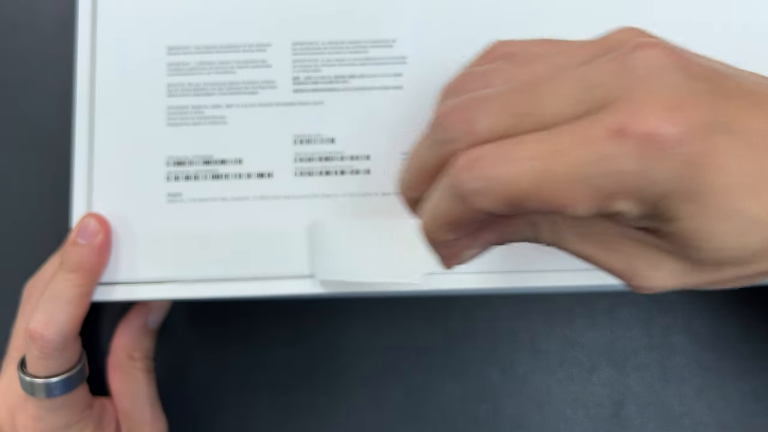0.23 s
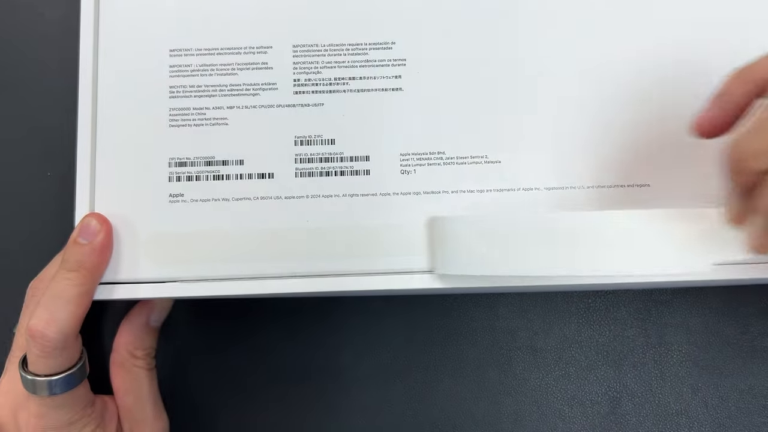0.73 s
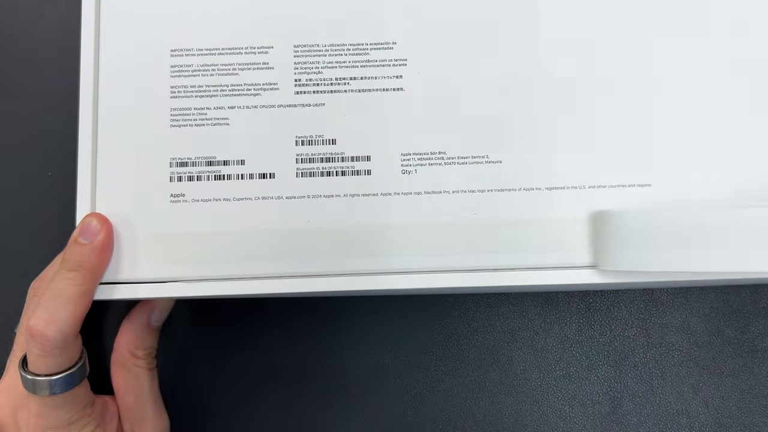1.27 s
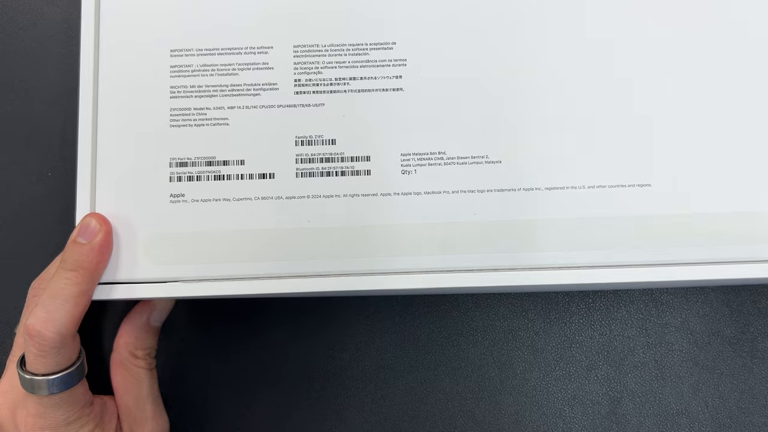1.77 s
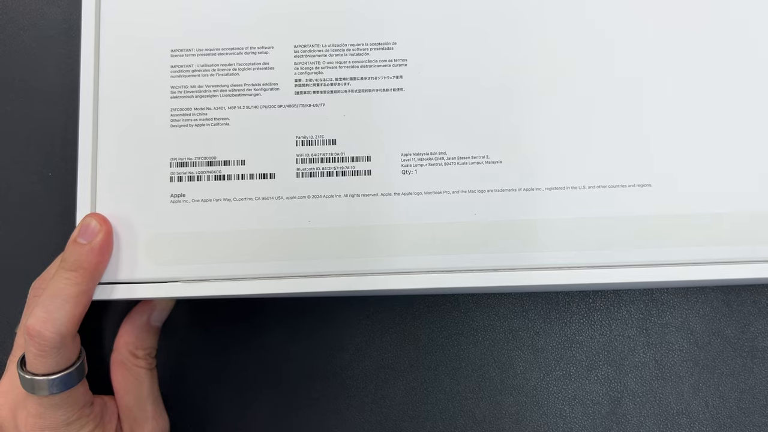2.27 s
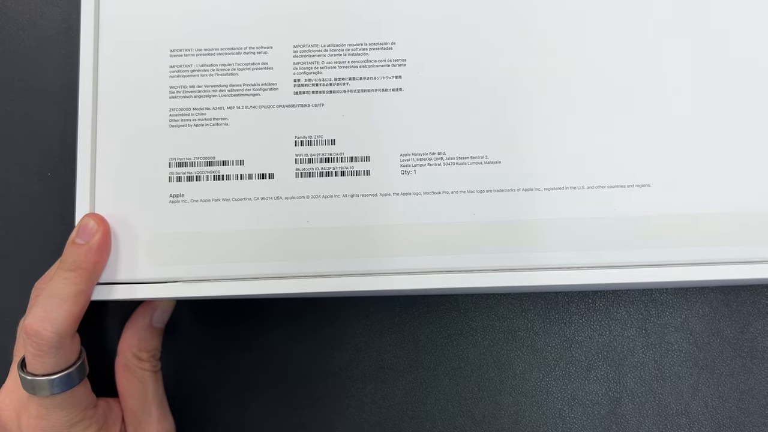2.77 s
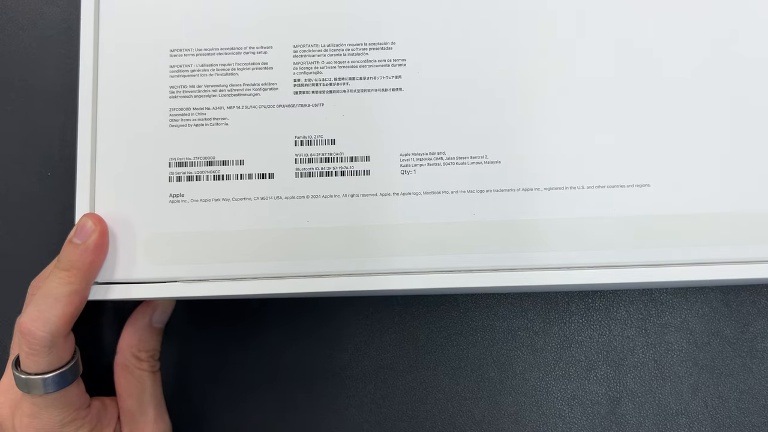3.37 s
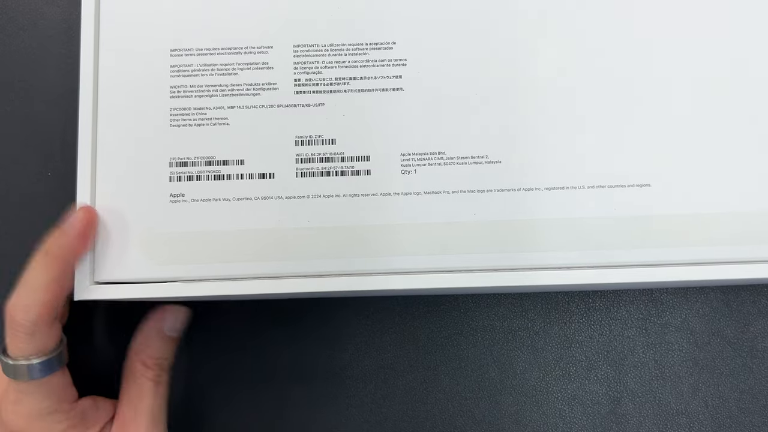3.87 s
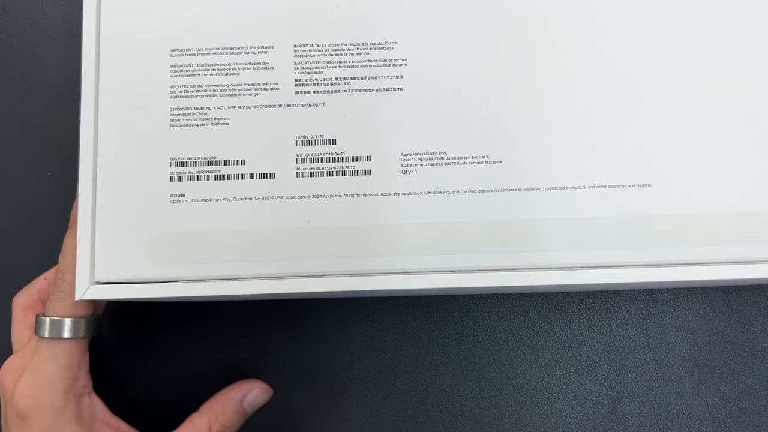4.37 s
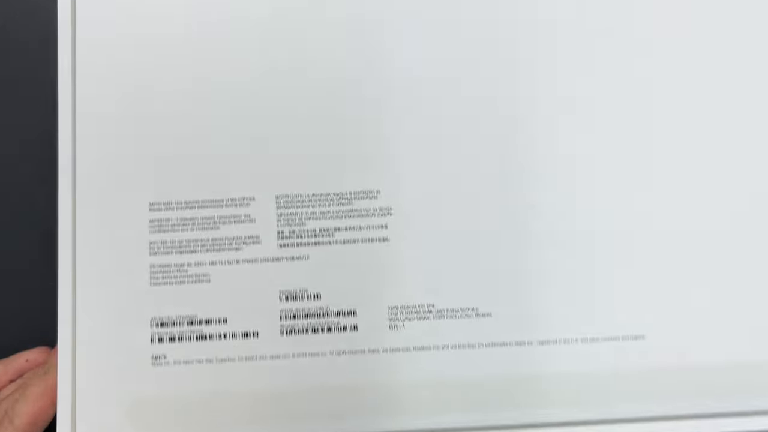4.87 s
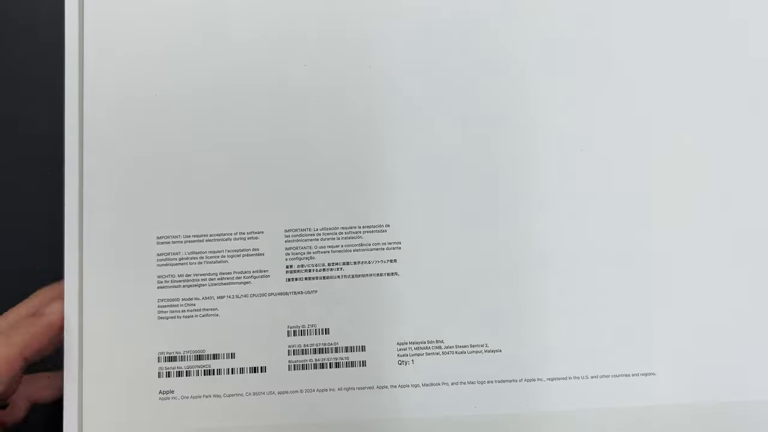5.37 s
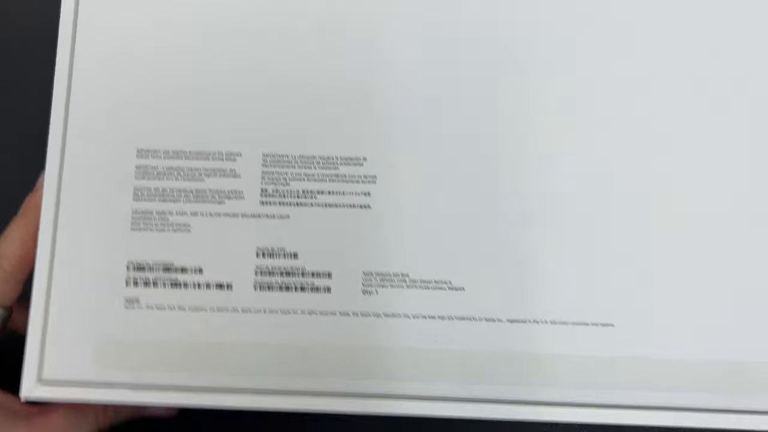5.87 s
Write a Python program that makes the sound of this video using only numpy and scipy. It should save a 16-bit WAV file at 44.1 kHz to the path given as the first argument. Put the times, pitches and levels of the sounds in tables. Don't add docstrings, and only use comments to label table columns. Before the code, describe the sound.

Crackling peel of a glued cardboard strip ends in a sharp snap; after a quiet gap, hard little taps and faint box rubbing over ventilation rumble.

```python
import sys
import numpy as np
from scipy import signal
from scipy.fft import rfft, irfft
from scipy.io import wavfile
from scipy.ndimage import uniform_filter1d

SR = 44100
rng = np.random.default_rng(int(sys.argv[2]) if len(sys.argv) > 2 else 0)


def attenuation_scalar(level_db):
    decades = np.asarray(level_db, float) / 20
    return 10 ** decades


def wrap_up_sound(samples):
    columns = np.atleast_2d(samples).T
    tamed = np.clip(columns, -1, 1)
    steps = np.round(tamed * 32767).astype(np.int16)
    wavfile.write(sys.argv[1], SR, steps)


N = 269495
TIME = np.arange(N) / SR
BINS = np.fft.rfftfreq(N, 1 / SR) + 1e-3
SHORT = 2048
SHORT_BINS = np.fft.rfftfreq(SHORT, 1 / SR) + 1
AGE = (np.arange(SHORT) - SHORT // 8) / SR

# time_s, rasp_level_db, lid_load_db
PULL = [(0.0, -52, -4), (0.3, -51, -2), (0.55, -48, 1), (0.8, -48.5, -3.5), (0.95, -49.5, -3.5),
        (1.12, -46, 1), (1.41, -44.5, 2.5), (1.68, -46.5, 0), (1.87, -50.5, 1), (2.04, -45.5, -0.5),
        (2.15, -50.5, -2.5), (2.3, -45.5, 4)]
# time_s, lid_pitch_hz, strip_tension_db_per_octave
TRAVEL = [(0, 1300, 6), (.85, 1460, 6), (1.1, 1050, 1), (1.32, 1020, 2), (1.45, 730, 2), (1.6, 560, 15),
          (1.75, 480, -1), (1.95, 523, 3), (2.05, 523, 2), (2.3, 980, 11)]
# time_s, level_db
BOOM = [(0, 10), (.3, 1), (.7, -0.5), (1.1, 0.5), (1.3, -2.5), (1.5, 1), (1.75, -2.5), (2.05, 3.5),
        (2.3, 0)]
# start_s, level_db, tick_db (re level), ring_hz
DEEP_CRACKS = [(0.3332, -43.5, 13, 3320), (0.6038, -37.5, 5, 3100), (0.6757, -46, -5, 5630),
               (0.7275, -33, -1, 3300), (0.9852, -36.5, -3, 3050), (1.0867, -40, 11, 2260),
               (1.102, -39, 5, 3400), (1.1123, -32, 3, 3140), (1.159, -37, 3, 2780),
               (1.1929, -34.5, 5, 2200), (1.2325, -35.5, -2, 3330), (1.2618, -36, 6, 3070),
               (1.2864, -33.5, 7, 3270), (1.3265, -34, 13.5, 2200), (1.388, -41, -9, 3200),
               (1.412, -35, 1, 5500), (1.421, -28.5, 10, 3180), (1.4547, -31.5, 3, 2000),
               (1.5018, -32, -8, 3700), (1.5084, -35.5, 10, 3170), (1.5385, -36.5, 13, 3060),
               (1.6134, -34, 11, 5370), (1.6984, -38, 13, 3550), (1.745, -32.5, -8.5, 3460),
               (1.7834, -38, 10, 4700), (1.839, -33, 4, 5960), (1.9864, -28.5, 8.5, 5500),
               (2.0443, -32, 0, 5830), (2.0821, -36, 10, 4040), (2.109, -38.5, 1, 4080)]
# start_s, level_db, tick_db (re level), ring_hz
DRY_CRACKS = [(0.099, -35.5, 7, 3370), (0.135, -37, 1, 6230), (0.186, -36, 3, 6240),
              (0.2222, -38, -1, 3280), (0.2683, -41, 13, 2230), (0.4515, -37, -12, 3400),
              (0.491, -29.5, -18, 3260), (0.5255, -30, 6, 3660), (0.5539, -28, 4, 3400),
              (0.5646, -32, 10, 3430), (0.597, -30, 11, 4500), (0.7557, -33, 14, 3470),
              (0.7856, -32, 3, 3170), (0.8365, -30.5, 2, 3180), (0.9254, -31, -5, 3200),
              (1.0461, -30, 4, 3120), (1.0773, -34, -1, 3500), (1.1393, -28, 3, 3240),
              (1.1705, -33, 2, 3250), (1.2533, -33, 5, 3400), (1.311, -37, 2, 2200), (1.4604, -39, 6, 3080),
              (1.7182, -32, 3, 4570), (1.7596, -31.5, 9.5, 4700), (1.9185, -33, -4, 6000),
              (2.0117, -36, -3, 5760), (2.0305, -31, -7, 5800), (2.074, -32.5, -6, 5330),
              (2.1819, -33.5, 6, 3400), (2.2405, -28.5, -12, 4840)]
# start_s, level_db, thump_db (re level), tick_db (re level), ring_hz
LAST_CRACKS = [
    (2.2722, -36, -17, 2, 4890),
    (2.278, -32.5, -11, 9, 4700),
    (2.2833, -33, -8, 4, 4770),
    (2.288, -25, -8.5, -2, 4300),
    (2.2905, -37, 5, -6, 4000),
    (2.295, -30, -12, -8, 4140),
    (2.298, -35, -14, -8, 3880),
    (2.302, -21, -9, -22, 4500),
]
# start_s, level_db, thump_db (re level), tick_db (re level), ring_hz
SNAP = [
    (2.303, -21, -13, 11.5, 4400),
]
# level_db, thump_db, tick_db
SMALL_SPREAD_DB = [5, 5, 5]
# time_s, ring_hz
STRIP_PITCH = [(0, 3300), (1.55, 3300), (1.75, 4800), (2.3, 4800)]
# start_s, peak_db, body_db (re peak)
EARLY_TICKS = [(0.0122, -37, 1), (0.0325, -42, -9), (0.04, -37.5, -13), (0.05, -29.5, -6),
               (0.0612, -47, -7), (0.0758, -37, 5), (0.0846, -36, -5), (0.0977, -39, -5),
               (0.1237, -37, -13), (0.1352, -30, 0), (0.1439, -43, -8), (0.1656, -41, -5),
               (0.1866, -34, -10), (0.1946, -38, -11), (0.2018, -44, -13), (0.2217, -31.5, 0),
               (0.2314, -29, 0), (0.242, -41, -4), (0.2463, -42, -5), (0.2516, -40, 0), (0.2697, -29, -11),
               (0.2754, -43, -6), (0.2811, -36, -9), (0.2902, -41, -4), (0.2996, -44, -10),
               (0.3277, -35.5, -9), (0.3336, -38, -6), (0.3436, -33, 6), (0.3777, -34, 0),
               (0.3992, -39, -7), (0.4073, -43, -7), (0.4529, -40, 7), (0.4628, -37, 4), (0.4912, -41, 7),
               (0.515, -36, -4), (0.525, -36, -1), (0.535, -37, 5), (0.5553, -33, 2), (0.5649, -36, 0),
               (0.5793, -45, -4), (0.5974, -31, -1), (0.6041, -31, 9), (0.6228, -41, -3), (0.6571, -48, -1),
               (0.6772, -33.5, 5), (0.7275, -33.5, 0), (0.7546, -33, -8), (0.7594, -37, 6),
               (0.7759, -36, 0), (0.7975, -33, 0), (0.8258, -38, -4), (0.8786, -41, -1), (0.8875, -42, -3),
               (0.9077, -42, -2), (0.9283, -36, -6), (0.9771, -39, -3), (1.0034, -35, -2),
               (1.0466, -38, -2), (1.0771, -35, -3), (1.0869, -31, 5)]
LATE_TICKS = [(1.1026, -35, -6), (1.1132, -31, -2), (1.1204, -43, -5), (1.128, -42, -7), (1.1354, -38, 2),
              (1.1402, -32, -4), (1.155, -35, -1), (1.1587, -39, -5), (1.166, -41, -5), (1.1932, -35, 1),
              (1.233, -34.5, -8), (1.246, -36, -5), (1.2539, -31, 1), (1.261, -33, 1), (1.288, -31.5, -4),
              (1.3133, -33, -4), (1.327, -31, -5), (1.3485, -40, -4), (1.3651, -40, -1), (1.38, -33, -3),
              (1.4021, -41, -4), (1.4144, -30, -3), (1.4213, -35.5, -1), (1.4528, -37, 0),
              (1.461, -30.5, -6), (1.509, -37, -8), (1.515, -44, -5), (1.5385, -35, -7), (1.5756, -33, -4),
              (1.5885, -33, -2), (1.596, -40, -1), (1.607, -39, -5), (1.614, -36, -3), (1.6922, -43, 5),
              (1.6987, -33, 4), (1.7142, -38, -1), (1.739, -40, 5), (1.745, -42, 2), (1.7827, -32, -6),
              (1.789, -34, -8), (1.8245, -40, -4), (1.8313, -40, -3), (1.838, -37, -9), (1.8453, -37, -2),
              (1.8597, -32, 5), (1.9108, -42, -3), (1.968, -41, 9), (1.9861, -44, -5), (2.0124, -36, -7),
              (2.0194, -37, -7), (2.0314, -35, -6), (2.045, -33, -3), (2.0739, -37, 4), (2.083, -41.5, -4),
              (2.1096, -36, -3), (2.1282, -40, 2), (2.172, -37, -2), (2.211, -39, -3), (2.2305, -41, -6),
              (2.243, -38, 0)]
TICKS = np.vstack([EARLY_TICKS, LATE_TICKS])
# start_s, level_db, thump_db (re level), tick_db (re level), ring_hz
CLICKS = [(2.887, -56, -10, 5, 5000), (3.45, -62, 6, 5, 5000), (3.6068, -29, -6.5, 7.5, 4150),
          (3.613, -41, 2, 12, 6400), (3.6212, -42, -11, 6, 4400), (3.6564, -53, -13, 19, 5300),
          (3.7546, -41.5, -43, 10, 5300), (3.7565, -43, -40, 3, 5230), (3.7605, -47, -34, 9, 5200),
          (3.7635, -44, -34, -6, 5200), (3.779, -52, -34, -6, 5200), (3.8755, -52, -2, 9, 4500),
          (4.0664, -46, -3, -4, 2630), (4.2075, -54, -4, -9, 2020), (4.2205, -36, -9, -10, 2300),
          (4.2217, -50, -20, -10, 4470), (4.2335, -44, -15, -3, 4400), (4.244, -58, 13, -26, 1960),
          (4.2602, -23, -9, 7.5, 5000), (4.268, -34.5, 1, 4, 4700), (4.3325, -35.5, -9, 1, 3380),
          (4.405, -54, 10, -3, 4000), (4.4105, -46, 5, 8, 5080), (4.414, -50.5, 8, -5, 2730),
          (5.239, -53, 0, -1, 5760), (5.54, -54, -7, 5, 5000), (5.662, -54.5, 10, -10, 2500)]
# start_s, level_db, pitch_hz, t60_s
KNOCKS = [
    (4.2625, -39.5, 760, 0.14),
    (3.608, -44, 790, 0.16),
]
# peak_s, level_db, rise_db_per_s, fall_db_per_s, brightness_db
STROKES = [
    (3.458, -66, 120, 400, -2),
    (4.45, -70, 600, 10, -6),
    (4.662, -52, 44, 65, -12),
    (5.232, -63, 800, 450, 3),
    (5.322, -64, 342, 210, 2),
    (5.568, -62.5, 159, 300, -0.5),
    (5.702, -69, 60, 18, -7),
    (6.068, -52, 30, 12, -9),
]
# pitch_hz, width_hz, level_db
LID = [(480, 39, 11), (616, 105, 13), (763, 48, 8), (1050, 270, 8), (1300, 46, 6.5), (1576, 125, 13)]
STRIP = [(2200, 610, 10), (3430, 610, 14), (4590, 510, 4.5), (5800, 2000, 2.5)]
DRUM = [(260, 203, -3), (368, 153, 0)]
SCRAPE = [(1000, 1300, 4), (1540, 2600, 2.5)]
# pitch_hz, level_db_per_hz
TICK = [(5000, -5), (6500, 4), (9000, -0.5), (11500, 0), (14500, 0), (15700, 5)]
# pitch_hz, t60_s, level_db
ROOM = [(300, 0.36, -21), (667, 0.28, 14.5), (1610, 0.38, 6.5), (3280, 0.33, 8), (5000, 0.34, 4.5),
        (7760, 0.31, -16), (12600, 0.31, 3.5)]
# pitch_hz, level_db_per_hz
RUMBLE = [(20, -96), (40, -76), (80, -71.5), (130, -70), (180, -75.5), (300, -75.5), (500, -84),
          (1000, -90), (2000, -101), (3600, -109), (6000, -120)]
HISS = [(2500, -120), (4800, -108), (6500, -105), (7700, -102), (8500, -106), (9100, -114), (12000, -116),
        (15500, -119)]
# pitch_hz, width_hz, level_db
WHINE = [(4230, 210, -71.5)]
HUM_HZ = [65, 100, 200, 700]
HUM_DB = [-52, -47.5, -52, -69]
# share, from_hz
ECHO_SHARE = (.985, 5000)
AIR_SHARE = (.88, 5800)
# pitch_hz, lead_rad
PORT_LEAD = [(0, 0), (700, -.6), (1700, 0), (2800, 2.2), (3800, 1.5), (5100, 1.2), (5900, np.pi),
             (14800, 5 * np.pi), (19250, 7 * np.pi)]
# pitch_hz, level_db
PORT_BALANCE = [(400, 0), (1200, -1), (2500, -2.5), (4500, -2.5), (5600, 0)]


def peel():
    s, *columns = np.transpose(PULL)
    pull_db, load_db = (np.interp(TIME, s, c) for c in columns)
    travel_s, *columns = np.transpose(TRAVEL)
    lid_hz, tension_db = (np.interp(TIME, travel_s, c) for c in columns)
    thickness = fray()

    boom_db = np.interp(TIME, *np.transpose(BOOM))
    thumps = attenuation_scalar(load_db - 7.5 + boom_db) / thickness * bursts(150, 4.7, 0.0043)
    fibres = attenuation_scalar(-0.61 * load_db - 5) * bursts(900, 4.6, 0.0019)
    rasp = cardboard(thumps, fibres, DRUM)

    strip_hz = np.interp(TIME, *np.transpose(STRIP_PITCH))
    strip_db = [tension_db * np.log2(hz / strip_hz) - 22.5 for hz, _, _ in STRIP]
    rasp += rain(STRIP, strip_db, 220, 0.005)
    lid_db = [load_db - 27 - np.minimum(76 * np.log2(hz / lid_hz) ** 2, 12) for hz, _, _ in LID]
    rasp += rain(LID, lid_db, 300, 0.0022) / np.sqrt(thickness)

    jerk_db = 1.5 * wander(700)
    rasp *= (TIME < s[-1]) * attenuation_scalar(pull_db + jerk_db + 2) * thickness
    strong = cracks(*all_cracks(), decay_s=.0015, width_hz=500, strip_db=1, dull_hz=30000, tail_db=-17)
    return rasp + ticks() + strong


def all_cracks():
    deep = np.insert(np.array(DEEP_CRACKS), [2], -3.5, axis=1)
    dry = np.insert(np.array(DRY_CRACKS), [2], -18, axis=1)
    tick_trim_db = [0, 0, 0, -1.5, 0]
    return np.vstack([deep + tick_trim_db, dry + tick_trim_db, LAST_CRACKS, np.transpose(small_cracks())]).T


def small_cracks():
    per_s = 40
    s, pull_db, load_db = np.transpose(PULL)
    count = int(per_s * s[-1])
    times = (np.arange(count) + rng.random(count)) / per_s
    *colour, pitch = rng.standard_normal((count, 4)).T
    level_db, thump_db, tick_db = np.c_[SMALL_SPREAD_DB] * colour
    level_db = np.interp(times, s, pull_db) + 12 - abs(level_db)
    thump_db = np.interp(times, s, load_db) - 28 + thump_db
    ring_hz = np.interp(times, *np.transpose(STRIP_PITCH)) * 2 ** (.14 * pitch)
    return times, level_db, thump_db, tick_db - 4, ring_hz


def cracks(times, db, thump_db, tick_db, ring_hz, decay_s, width_hz, strip_db, dull_hz, tail_db):
    bins = SHORT_BINS
    envelope = np.exp(-abs(AGE) / decay_s) + attenuation_scalar(tail_db) * np.exp(-abs(AGE) / .006)
    puff = rfft(rng.standard_normal((len(times), SHORT)) * (AGE >= 0) * envelope)

    own_hz = ring_hz[:, None]
    own = resonate([(own_hz, width_hz, 0)], bins) / (1 + (0.35 * own_hz / bins) ** 4)
    ring = attenuation_scalar(strip_db + thump_db[:, None] / 2) * resonate(STRIP, bins) + own
    lid_hz = np.interp(times, *np.transpose(TRAVEL)[:2])[:, None]
    lid = resonate(LID, bins) + attenuation_scalar(6) * resonate([(lid_hz, 300, 0)], bins)
    tick = curve_gain(TICK, bins) / (1 + (bins / dull_hz) ** 3)
    parts = ((resonate(DRUM, bins), thump_db - 0.5), (lid, thump_db + 1), (ring, 0), (tick, tick_db - 7.5))

    total = sum(5.05 * attenuation_scalar(db + part_db)[:, None] * unit(puff * gain) for gain, part_db in parts)
    return impulses(times, irfft(total))


def ticks():
    s, peak_db, body_db = np.transpose(TICKS)
    puff = rfft(rng.standard_normal((len(s), SHORT)) * (AGE >= 0) * np.exp(-abs(AGE) / .0004))
    own_hz = np.interp(s, *np.transpose(STRIP_PITCH))[:, None]
    bright = irfft(puff * curve_gain(TICK, SHORT_BINS))
    body = irfft(puff * (resonate(STRIP, SHORT_BINS) + resonate([(own_hz, 600, 0)], SHORT_BINS)))

    def peak(x, db):
        return x * (attenuation_scalar(db) / abs(x).max(axis=1))[:, None]

    return impulses(s - .0003, peak(bright, peak_db + 4) + peak(body, peak_db + body_db - 6.5))


def fray():
    s, peak_db, _ = np.transpose(TICKS)
    swell = np.exp(-np.maximum(AGE / 0.0057, -AGE / 0.0029))
    return np.sqrt(.5 + impulses(s, attenuation_scalar(2 * (peak_db + 35.5))[:, None] * swell))


def rain(modes, weights_db, rate, decay_s):
    out = np.zeros(N)
    for (hz, width, db), weight_db in zip(modes, weights_db):
        clumps_db = 3.34 * wander(1500)
        fibres = attenuation_scalar(db + weight_db + clumps_db) * bursts(rate, 0.7, decay_s)
        out += shaped(fibres, resonate([(hz, width, 0)]))
    return out


def cardboard(low, high, body):
    return shaped(low, resonate(body)) + shaped(high, unit(curve_gain(TICK)))


def clicks():
    s, db, *colour = np.transpose(CLICKS)
    snap = cracks(*np.transpose(SNAP), decay_s=.00001, width_hz=1500, strip_db=0.91, dull_hz=30000, tail_db=-59)
    near = cracks(s, db, *colour, decay_s=0.0003, width_hz=1570, strip_db=0.5, dull_hz=8000, tail_db=-20)
    far = cracks(s, db - 8.5, *colour, decay_s=.00001, width_hz=3500, strip_db=3, dull_hz=4200, tail_db=-50)
    side = np.array([[.5], [-.5]])
    ports = attenuation_scalar(-3.5 * side) * snap + attenuation_scalar(-2 * side) * (near + knock())
    return ports, attenuation_scalar(-4) * snap + far


def knock():
    out = np.zeros(N)
    for s, db, hz, t60 in KNOCKS:
        since = TIME - s
        decay = np.exp(-np.log(1000) * abs(since) / t60)
        out += attenuation_scalar(db) * (since > 0) * decay * np.sin(2 * np.pi * hz * since)
    return out


def slide():
    round_db = 3
    push = np.zeros((3, N))
    for s, peak_db, rise_db, fall_db, bright_db in STROKES:
        drop_db = np.maximum(rise_db * (s - TIME), fall_db * (TIME - s))
        db = peak_db + round_db - np.hypot(drop_db, round_db)
        push = np.maximum(push, attenuation_scalar([db - 7.5 - 0.17 * bright_db, db - 5.5, db + bright_db]))
    grain = attenuation_scalar(0.74 * wander(400))
    low, middle, high = push * grain * rng.standard_normal((3, N))
    squeaks = rain([(1140, 260, -9), (1510, 280, -3), (1950, 220, -13)], [-13, -13, -13], 330, 0.0054)
    low = low + push[0] * squeaks
    return cardboard(low, high, SCRAPE) + shaped(middle, resonate([(2660, 500, -9.5), (4570, 3900, -15)]))


def room(x):
    t = TIME[:SR // 2]
    onset = np.clip((t - .007) / 0.0083, 0, 1)
    echo = np.zeros((2, N))
    for hz, t60, db in ROOM:
        band_pass = signal.butter(2, [hz / 1.48, hz * 1.69], "band", fs=SR, output="sos")
        band = signal.sosfilt(band_pass, rng.standard_normal((2, len(t))))
        echo[:, :len(t)] += attenuation_scalar(db) * band * np.exp(-np.log(1000) * t / t60) * onset
    return shaped(x, rfft(echo / np.sqrt(np.mean(np.sum(echo ** 2, axis=1)))))


def ventilation():
    mid, side = rfft(rng.standard_normal((2, N))) * np.sqrt(SR / 2)
    apart = .7 / (1 + (380 / BINS) ** 4)
    ports = (mid + apart * side * np.array([[1], [-1]])) / np.sqrt(1 + apart ** 2)
    air = irfft(np.hypot(curve_gain(RUMBLE), curve_gain(HISS)) * ports, N)
    whine = np.zeros(len(BINS))
    for hz, width, db in WHINE:
        whine += attenuation_scalar(db) * np.sqrt(2 / (np.pi * width) / (1 + (2 * (BINS - hz) / width) ** 4))
    shade = attenuation_scalar(np.interp(TIME, [4.3, 4.6], [0, -6]))
    air += shade * irfft(whine * ports[::-1] * 1j, N)
    for hz, db in zip(HUM_HZ, HUM_DB):
        air += np.sqrt(2) * attenuation_scalar(db) * np.sin(2 * np.pi * (hz * TIME + rng.random()))
    return air


def shared_treble(ports, share, from_hz):
    left, right = ports
    return np.array([left + shaped(right - left, share / (1 + (from_hz / BINS) ** 12)), right])


def wander(samples):
    return np.sqrt(samples) * uniform_filter1d(rng.standard_normal(N), size=samples)


def bursts(rate, spread_db, decay_s):
    sizes = (rng.random(N) < rate / SR) * attenuation_scalar(spread_db * rng.standard_normal(N))
    envelope = signal.lfilter([1], [1, -np.exp(-1 / (decay_s * SR))], sizes)
    puffs = envelope * rng.standard_normal(N)
    return puffs / np.std(puffs)


def impulses(times, shapes):
    out = np.zeros(N + SHORT)
    starts = (np.asarray(times) * SR).astype(int)
    np.add.at(out, starts[:, None] + np.arange(SHORT), shapes)
    return out[SHORT // 8:N + SHORT // 8]


def resonate(modes, bins=BINS):
    total = 0
    for k, (hz, width, db) in enumerate(modes):
        total = total + (-1) ** k * attenuation_scalar(db) / (1 + 1j * (bins - hz ** 2 / bins) / width)
    return unit(total)


def curve_gain(points, bins=BINS):
    hz, db = np.transpose(points)
    return attenuation_scalar(np.interp(np.log(bins), np.log(hz), db, left=-200, right=-200))


def unit(gain):
    return gain / np.sqrt(np.mean(abs(gain) ** 2, axis=-1, keepdims=True))


def shaped(x, gain):
    return irfft(rfft(x) * gain, N)


def scene():
    paper, rub = peel(), slide()
    near, to_walls = clicks()
    echo = room(attenuation_scalar(-11.5) * paper + attenuation_scalar(-14.5) * rub + to_walls)
    return paper + rub + near + shared_treble(echo, *ECHO_SHARE) + shared_treble(ventilation(), *AIR_SHARE)


def top_cut(x):
    return signal.sosfilt(signal.butter(12, 17660, fs=SR, output="sos"), x)


def record(dry):
    left, right = rfft(dry)
    left = left * np.exp(1j * np.interp(BINS, *np.transpose(PORT_LEAD)))
    balance = attenuation_scalar(np.interp(BINS, *np.transpose(PORT_BALANCE)) / 2)
    top = 1 / (1 + (BINS / 15760) ** 90)
    mix = irfft(np.array([left * balance, right / balance]) * top, N)
    return top_cut(mix)


dry = scene()
out = record(dry)
wrap_up_sound(out)
```